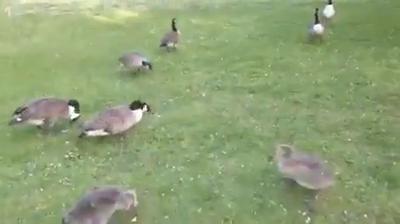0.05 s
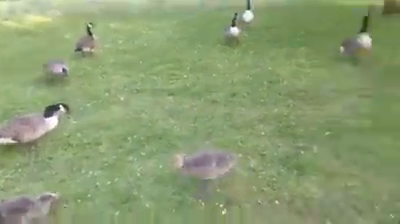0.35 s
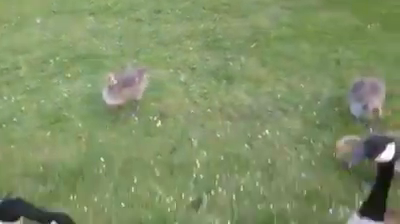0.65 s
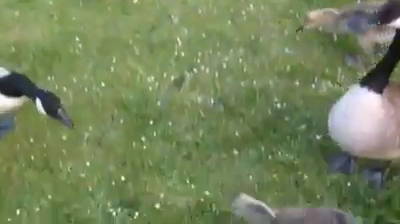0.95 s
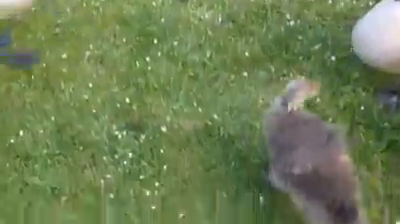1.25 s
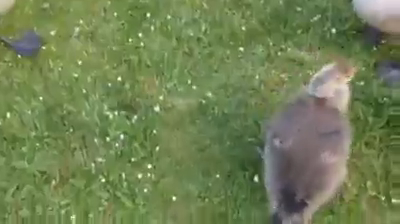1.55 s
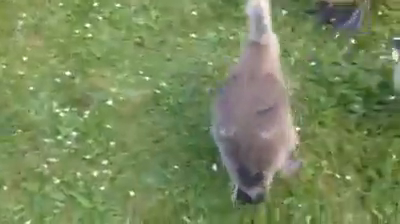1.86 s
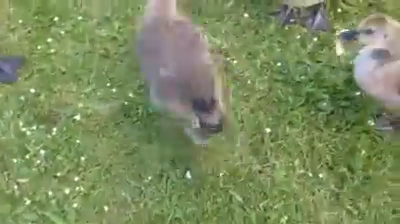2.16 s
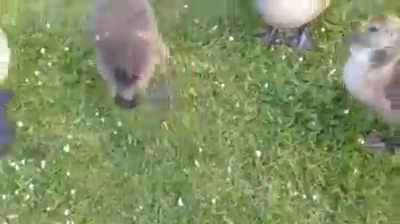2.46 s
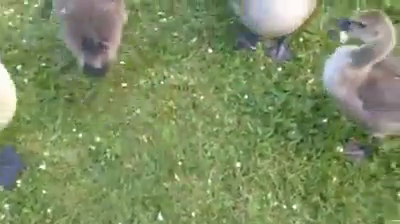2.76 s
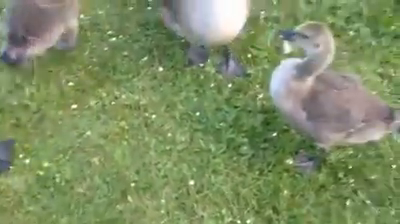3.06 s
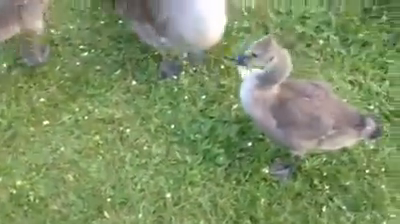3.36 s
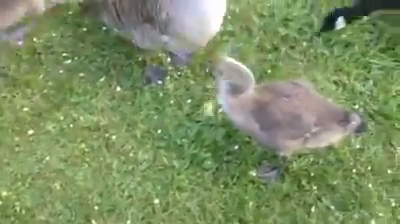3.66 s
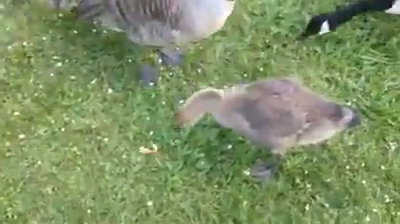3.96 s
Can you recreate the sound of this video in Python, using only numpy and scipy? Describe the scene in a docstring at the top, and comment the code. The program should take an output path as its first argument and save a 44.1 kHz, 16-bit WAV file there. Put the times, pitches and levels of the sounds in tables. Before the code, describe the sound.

A goose hisses in two long swells and gives a few soft, low grunts. Midway, goslings whistle quick peeps, then three husky cheeps. The birds are close to the microphone on an open lawn, with a faint, distant engine hum.

```python
"""An open lawn, with geese and goslings close to a small mono microphone.
An adult forces air through its open bill in two long swells of hiss, and soft low grunts pulse in
its long throat. Goslings whistle arched peeps from the syrinx, then give three husky cheeps.
Bills and feet tick in the grass, and distant engines hum under a bed of outdoor air."""
import sys
import numpy as np
from scipy import signal
from scipy.fft import rfft, irfft
from scipy.io import wavfile

SR = 44100
rng = np.random.default_rng(int(sys.argv[2]) if len(sys.argv) > 2 else 0)


def master(y):
    """Save y as 16-bit WAV."""
    cut = np.clip(np.atleast_2d(y).T, -1, 1)
    pcm = np.round(cut * 32767)  # scale
    wavfile.write(sys.argv[1], SR, pcm.astype(np.int16))


N = 176400
T = np.arange(N) / SR
TOP_HZ = 10450

# Tone of the outdoor air. Each row: frequency in Hz, relative spectral level in dB.
AIR_COLOUR = [(22, -17), (40, -5.5), (70, -2.5), (105, -3.5), (150, 1), (205, -1), (290, -7), (500, -14),
              (900, -14), (1600, -14), (2300, -17), (2900, -21.5), (4000, -21.5), (7000, -32), (10500, -37)]
# Fader rides for the air and three far engines. Each row: time in seconds, level in dB.
AIR_RIDE = [(0, -52), (.3, -52.5), (1.2, -51.5), (2.2, -50.5), (3, -50.5), (4, -49.5)]
MID_ENGINE_RIDE = [(0, -63), (.17, -55), (.75, -55.5), (1.28, -55), (1.36, -59.5), (2.4, -71), (4, -63.5)]
HIGH_ENGINE_RIDE = [(0, -77), (1.5, -75), (1.8, -58), (2.3, -58), (2.5, -65.5), (4, -70.5)]
LOW_ENGINE_RIDE = [(0, -75), (1.7, -78), (2.4, -61), (2.9, -60), (3.3, -53.5), (4, -53)]
# Tone of the adult's hiss. Each row: frequency in Hz, relative spectral level in dB.
HISS_COLOUR = [(300, -18), (550, 6), (800, -13), (1500, -0.5), (2600, -2), (4000, 3), (6000, 2.5),
               (8300, 3), (9500, 2), (10500, -7.5)]
# The two swells of hiss. Each row: time in seconds, level in dB.
HISS_RIDE = [(0, -68.5), (.6, -64), (1.06, -62.5), (1.1, -57.5), (1.22, -54.5), (1.245, -50.5), (1.28, -55),
             (1.305, -49), (1.335, -52.5), (1.475, -50.5), (1.525, -48), (1.56, -55), (1.615, -48),
             (1.7, -53.5), (1.815, -51), (1.85, -55), (1.89, -53), (1.922, -48.5), (1.96, -51), (2.04, -55),
             (2.18, -61), (2.235, -52), (2.28, -59), (2.38, -58.5), (2.52, -55), (2.575, -52.5),
             (2.603, -48), (2.635, -55), (2.77, -59.5), (2.86, -53.5), (3.02, -53), (3.19, -51),
             (3.225, -47), (3.3, -48), (3.345, -51.5), (3.43, -51.5), (3.55, -54), (3.68, -59.5),
             (3.8, -64.5), (4, -61.5)]
# The adult's grunts. Each row: centre and length in seconds, pulse rate in Hz, level in dB,
# high cut in Hz, chest and mouth resonances in Hz, mouth gain in dB.
GRUNTS = [(.312, .125, 104, -52, 950, 270, 880, -14), (.604, .058, 108, -49, 950, 240, 830, -13),
          (2.563, .05, 155, -51.5, 700, 290, 650, -15), (2.865, .036, 300, -42.5, 3000, 305, 690, -9),
          (3.59, .04, 350, -48, 700, 325, 640, -14)]
# Steady resonances of the adult's throat. Each row: centre in Hz, width in Hz, gain in dB.
THROAT_RESONANCES = [(400, 70, -4), (900, 140, -17), (1600, 140, -18), (2370, 240, -11)]
# Ticks in the grass. Each row: start in seconds, peak in dB, band centre in Hz, decay in seconds.
GRASS_TICKS = [(1.074, -43, 6500, 0.0018), (1.095, -33, 3400, 0.0016), (1.345, -31.5, 5800, 0.00095),
               (1.598, -40, 4500, 0.0053), (2.554, -40, 4000, .006), (2.716, -42, 3200, 0.0044),
               (3.377, -36, 7500, 0.0015), (3.897, -45.5, 6500, .004)]
# One contour per peep. Each row: time in seconds, pitch in Hz, level in dB, octave's level in dB.
PEEP_CONTOURS = [
    [(2.02, 845, -63, -69), (2.06, 1160, -53.5, -74), (2.095, 1260, -49.5, -51.5),
     (2.126, 1253, -49.5, -57), (2.137, 1122, -69, -73), (2.16, 934, -55, -75)],
    [(2.045, 2100, -65, -80), (2.07, 2720, -58, -80), (2.084, 2775, -56, -80), (2.095, 2600, -58, -80),
     (2.122, 2560, -57, -80), (2.135, 2840, -55, -80), (2.154, 1920, -71, -84)],
    [(2.208, 1083, -58, -67), (2.216, 1147, -48, -67), (2.236, 1280, -60, -51.5), (2.25, 1670, -44, -78),
     (2.27, 1803, -46, -79), (2.299, 1616, -49, -72), (2.318, 1907, -43.5, -78), (2.333, 1740, -45, -68),
     (2.348, 1603, -53, -50.5), (2.358, 1490, -56, -58)],
    [(2.277, 1395, -69, -49), (2.29, 1465, -55, -54), (2.301, 1310, -47.5, -43.5), (2.311, 1312, -52, -46),
     (2.321, 1331, -57, -41), (2.337, 1230, -47.5, -62), (2.345, 1140, -55, -52)],
    [(2.398, 932, -58, -64), (2.428, 1369, -57.5, -53.5), (2.44, 1550, -49, -75), (2.455, 1798, -52, -80),
     (2.468, 1847, -46, -76), (2.479, 1807, -50.5, -54), (2.489, 1653, -38, -59),
     (2.502, 1458, -47.5, -47.5), (2.517, 1334, -61, -47.5), (2.53, 1040, -50, -64)],
    [(2.555, 1860, -46.5, -72), (2.56, 1980, -43.5, -64), (2.573, 2240, -45, -72), (2.583, 2160, -48, -77),
     (2.591, 2056, -44, -68), (2.602, 2060, -42.5, -61), (2.613, 1763, -35.5, -69),
     (2.622, 1590, -44.5, -52.5), (2.635, 1390, -64, -72)],
]
# The voice split in each peep. Each row: third harmonic in dB against the octave,
# moment of the split in seconds, second whistle in dB against the first.
PEEP_SPLITS = [(-16, 2.055, -2), (-20, 2.08, -5), (-18, 2.272, -3), (-7.5, 2.295, -8), (-20, 2.474, -2),
               (-20, 2.592, -11)]
# Husky cheeps. Each row: centre and length in seconds, level in dB, upper tone in dB against
# the lower, pitch rise as a share of the pitch (negative falls).
CHEEPS = [(3.272, 0.07, -49, -12, .15), (3.539, .05, -50.5, -3.5, 0), (3.81, 0.0412, -56.5, 0, -0.5)]
# A gosling's lower and upper throat resonances, in Hz.
GOSLING_THROAT_HZ = (1923, 2730)


def undb(db):
    """Decibels to gain."""
    return 10 ** (np.asarray(db) / 20)


def unit(x):
    """Scale to a standard deviation of 1."""
    return x / (np.std(x) + 1e-12)


def curve(rows, column=1):
    """One column of a time table, joined by straight lines."""
    rows = np.array(rows, float)
    return np.interp(T, rows[:, 0], rows[:, column])


def wobble(rate_hz):
    """Smooth random modulation with spread 1, rolling off above rate_hz."""
    f = np.arange(N // 2 + 1) * SR / N
    smoothing = np.exp(-(f / rate_hz) ** 2) * (f > 0)
    return unit(irfft(rfft(rng.standard_normal(N)) * smoothing, N))


def unsteady_phase(hz, jitter, rate_hz):
    """Phase in radians of a pitch that strays by the share jitter."""
    return 2 * np.pi * np.cumsum(hz * (1 + jitter * wobble(rate_hz))) / SR


def resonance(x, hz, width_hz):
    """Two-pole band-pass, gain 1 at the centre."""
    return signal.lfilter(*signal.iirpeak(hz, hz / width_hz, fs=SR), x)


def swell(centre, length):
    """A rounded rise and fall around a moment."""
    return np.exp(-np.abs(2 * (T - centre) / length) ** 3)


def turbulence(colour, flicker_db, rate_hz):
    """Coloured noise in nine octave bands, each flickering in level on its own."""
    octaves = np.log2(np.maximum(np.arange(N // 2 + 1) * SR / N, 1))
    hz, db = np.array(colour, float).T
    spectrum = rfft(rng.standard_normal(N)) * undb(np.interp(octaves, np.log2(hz), db))
    centres = np.log2(TOP_HZ) - np.arange(9)[::-1]
    bands = (irfft(spectrum * np.interp(octaves, centres, solo), N) for solo in np.eye(9))
    return unit(sum(band * undb(flicker_db * wobble(rate_hz)) for band in bands))


def outdoor_air():
    """A soft, bass-heavy bed of gently flickering noise."""
    return turbulence(AIR_COLOUR, flicker_db=1.5, rate_hz=23) * undb(curve(AIR_RIDE))


def engine_hum(ride, hz, drift, waver_db, octave_db):
    """A far engine's wavering firing tone and its octave."""
    phase = unsteady_phase(hz, drift, rate_hz=10.35)
    tone = np.sqrt(2) * (np.sin(phase) + undb(octave_db) * np.sin(2 * phase))
    return tone * undb(curve(ride) + waver_db * wobble(14.4))


def goose_hiss(surge_db=1.05):
    """Air forced through the open bill rushes out in uneven surges."""
    breath = turbulence(HISS_COLOUR, flicker_db=1.1, rate_hz=39)
    return breath * undb(curve(HISS_RIDE) + surge_db * wobble(130))


def goose_grunts(shimmer_db=2.5, breath_db=-6, chest_width_hz=100, mouth_width_hz=150):
    """Short runs of uneven pulses and a little breath ring the adult's long throat."""
    out = 0
    for centre, length, pulse_hz, db, high_cut_hz, chest_hz, mouth_hz, mouth_db in GRUNTS:
        cycles = np.floor(unsteady_phase(pulse_hz, jitter=.2, rate_hz=262) / (2 * np.pi))
        pulses = unit(np.diff(cycles, prepend=0) * undb(shimmer_db * wobble(200)))
        source = pulses + undb(breath_db) * rng.standard_normal(N)
        formants = [(chest_hz, chest_width_hz, 0), (mouth_hz, mouth_width_hz, mouth_db)]
        formants += THROAT_RESONANCES
        voice = sum(undb(gain_db) * resonance(source, hz, width) for hz, width, gain_db in formants)
        band = signal.butter(2, [180, high_cut_hz], "band", fs=SR, output="sos")
        out += unit(signal.sosfilt(band, voice)) * swell(centre, length) * undb(db)
    return out


def grass_ticks():
    """Blades of grass snap under bills and feet, each a tiny burst of filtered noise."""
    out = 0
    for start, peak_db, hz, decay in GRASS_TICKS:
        envelope = (T >= start) * np.exp(-np.abs(T - start) / decay)
        snap = resonance(rng.standard_normal(N) * envelope, hz, width_hz=.7 * hz)
        out += undb(peak_db) * snap / np.abs(snap).max()
    return out


def gosling_peeps(fade_s=.0036, flutter_db=1.3, overtone_flutter_db=2, rasp=.25, split_ratio=.89):
    """The syrinx whistles with its octave, briefly splitting into two beating tones with a reedy edge."""
    out = 0
    for contour, (third_db, split_at, second_db) in zip(PEEP_CONTOURS, PEEP_SPLITS):
        start, end = contour[0][0], contour[-1][0]
        gate = np.clip(np.minimum(T - start, end - T) / fade_s + 1, 0, 1)
        roughness = undb(flutter_db * wobble(130)) * (1 + rasp * wobble(600))
        pitch = curve(contour)
        phase = unsteady_phase(pitch, jitter=.02, rate_hz=260)
        second_phase = unsteady_phase(split_ratio * pitch, jitter=.02, rate_hz=260)
        split = swell(split_at, length=.027)
        whistle = np.sin(phase) + undb(second_db) * split * np.sin(second_phase)
        whistle *= undb(curve(contour, column=2))
        overtones = np.sin(2 * phase) + undb(third_db) * split * np.sin(3 * phase)
        overtones *= undb(curve(contour, column=3) + overtone_flutter_db * wobble(130))
        out += np.sqrt(2) * gate * roughness * (whistle + overtones)
    return out


def ground_scatter(x, wet_db=-15, decay_s=.012):
    """Add the faint, brief smear thrown back by the ground and the birds' bodies."""
    tail = rng.standard_normal(N) * np.exp(-T / decay_s)
    return x + undb(wet_db) * signal.fftconvolve(x, tail / np.linalg.norm(tail))[:N]


def gosling_cheeps(rasp=.55):
    """Half-voiced calls: two hoarse, unsteady tones at the resonances of a gosling's throat."""
    out = 0
    for centre, length, db, upper_db, rise in CHEEPS:
        glide = 1 + rise * np.clip((T - centre) / length, -.5, .5)
        for hz, tone_db in zip(GOSLING_THROAT_HZ, (0, upper_db)):
            tone = np.sin(unsteady_phase(hz * glide, jitter=.05, rate_hz=400))
            hoarse = unit(tone * (1 + rasp * wobble(250)))
            out += hoarse * swell(centre, length) * undb(db + tone_db)
    return out


def scene():
    """Close birds over the distant bed, the same mono mix on both channels."""
    bed = outdoor_air()
    bed += engine_hum(MID_ENGINE_RIDE, hz=73.5, drift=.0712, waver_db=1.5, octave_db=-5)
    bed += engine_hum(HIGH_ENGINE_RIDE, hz=169.1, drift=.022, waver_db=1.5, octave_db=-33)
    bed += engine_hum(LOW_ENGINE_RIDE, hz=51.8, drift=.019, waver_db=1, octave_db=-10)
    mono = bed + goose_hiss() + goose_grunts() + grass_ticks()
    mono += ground_scatter(gosling_peeps()) + gosling_cheeps()
    return np.array([mono, mono])


def record(dry):
    """The recorder cuts the top end steeply."""
    return signal.sosfilt(signal.ellip(12, .2, 70, TOP_HZ, fs=SR, output="sos"), dry)


dry = scene()
out = record(dry)
master(out)
```